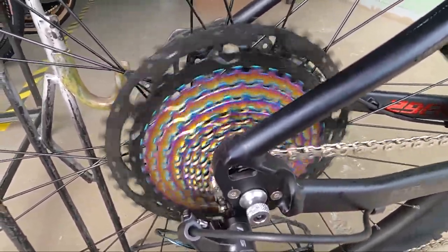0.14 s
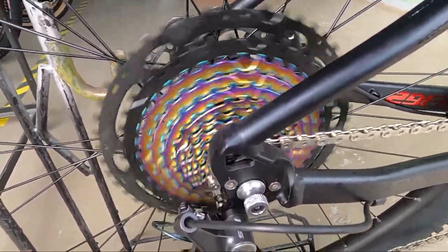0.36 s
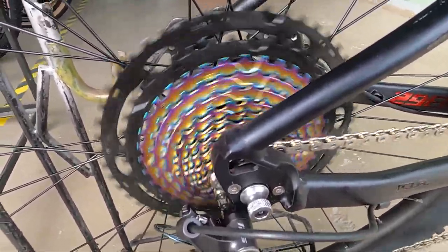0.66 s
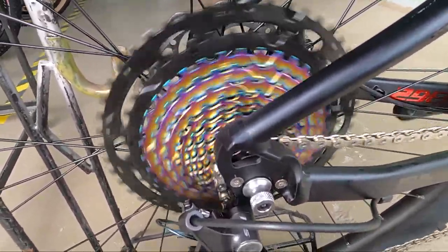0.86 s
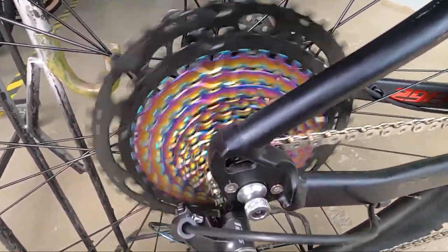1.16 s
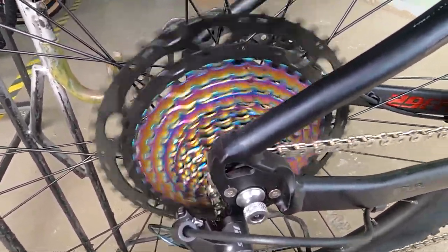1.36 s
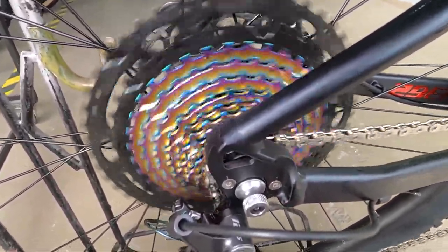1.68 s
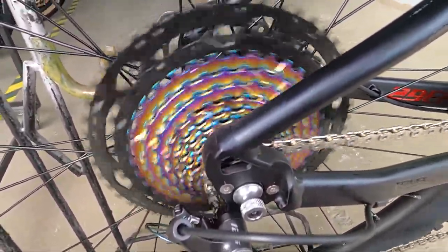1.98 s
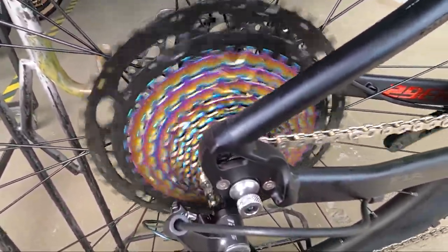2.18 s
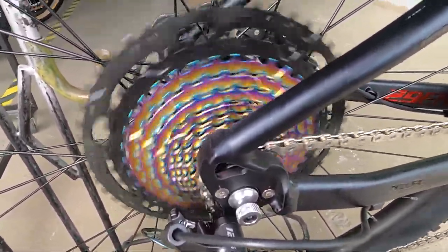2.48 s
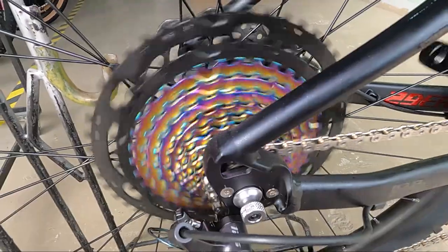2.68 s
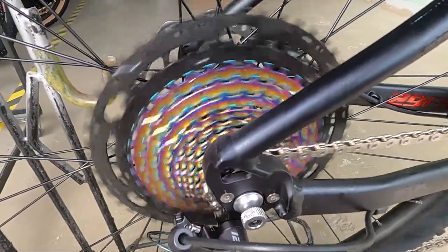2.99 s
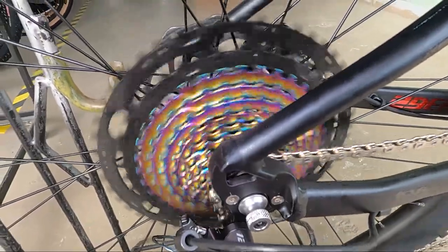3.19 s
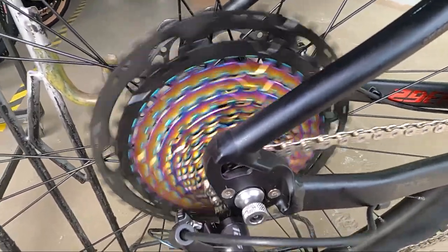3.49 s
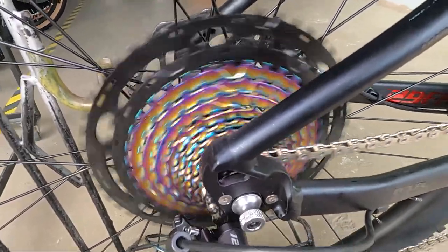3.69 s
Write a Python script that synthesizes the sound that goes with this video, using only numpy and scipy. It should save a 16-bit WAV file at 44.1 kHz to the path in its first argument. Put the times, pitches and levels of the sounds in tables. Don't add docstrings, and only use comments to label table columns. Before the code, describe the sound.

Rapid metallic ratchet buzz of a spinning bicycle rear hub, thin and hissy, gradually quickening.

```python
import sys
import numpy as np
from scipy import signal
from scipy.fft import rfft, irfft
from scipy.io import wavfile
from scipy.ndimage import uniform_filter1d, minimum_filter1d

SR = 44100
rng = np.random.default_rng(int(sys.argv[2]) if len(sys.argv) > 2 else 0)


def how_loud(loudness_db):
    steps = np.asarray(loudness_db, float) / 20
    return 10 ** steps


def put_to_file(sound):
    columns = np.atleast_2d(sound).T
    safe = np.clip(columns, -1, 1)
    whole_steps = np.round(safe * 32767)
    wavfile.write(sys.argv[1], SR, whole_steps.astype(np.int16))


N = 169785

# t/s, f/Hz (snaps of one pawl set)
RATCHET_SPEED = [(.17, 195), (.31, 177.1), (.45, 194.5), (.66, 179.1), (.96, 174), (1.07, 194.2),
                 (1.41, 196), (1.57, 174.9), (1.95, 181), (2.06, 192.2), (2.28, 186.8), (2.38, 205.3),
                 (2.57, 201.6), (2.88, 198.3), (2.97, 213.3), (3.38, 211), (3.52, 231.4), (3.68, 224.2)]
# f/Hz, width/Hz, level/dB
FRAME_MODES = [(1954.4, 56, -3), (2026, 77, -3.5), (2144, 63, -1.5), (2282, 30.5, 4), (2348, 35, 0.5),
               (2462, 70, -1.5), (2647, 105, -7), (2905, 370, -20.5)]
# t/s, level/dB
FRAME_GRIP = [(0.0, -34), (0.34, -32.5), (0.61, -39), (1.02, -33.5), (1.91, -40), (2.03, -44.5),
              (2.07, -39), (2.27, -42), (2.33, -32.5), (2.57, -40.5), (2.68, -30.5), (2.83, -41),
              (2.85, -30.5), (2.98, -39), (3.77, -43.5), (3.85, -55.5)]
# f/Hz, width/Hz, level/dB
HUB_MODES = [(6230, 174, -10.5), (7230, 47, -3.5), (7680, 130, -6), (8410, 150, -4.5), (8570, 108, -2),
             (9164, 220, -7), (9500, 390, -8.5), (10860, 160, -9), (11510, 214, -6.5), (12690, 320, -9.5),
             (14120, 340, -7), (16400, 120, 0.5)]
# f/Hz, density/dB per Hz
CRACK_COLOUR = [(3700, -18.5), (5900, -12), (6700, -8.5), (9000, -3.5), (10300, -7.5), (12100, -6.5),
                (13500, -12.5), (15700, -7)]
# upper edge f/Hz, gain/dB
SUPPRESSOR_BANDS = [
    (1500, -39),
    (1870, -47),
    (3020, 1),
    (3760, -62),
    (6080, -1),
    (12200, 4),
    (15750, 1.5),
    (22050, -57),
]
# from t/s, to t/s
LEAK_TIMES = [
    (0, .53),
    (.78, .92),
    (1.5, 1.55),
    (2.01, 2.04),
    (2.67, 2.7),
    (3.8, 3.85),
]
# lowest f/Hz, highest f/Hz, level/dB, threshold, threshold during leaks
FLICKER_STRIPS = [
    (3000, 3760, -68.5, 2.03, -0.12),
    (1506, 1870, -77, 0.15, 0.16),
    (906, 1500, -88, 1.7, 1.5),
]
# from t/s, to t/s, up to t/s also in the dull band
WIDE_TIMES = [(0, .27, .15), (.47, .54, .52), (.82, .96, .96), (1.12, 1.2, 1.18), (1.35, 1.71, 1.57),
              (1.96, 2.29, 2.1), (2.5, 2.54, 2.5), (2.61, 3.6, 2.71), (3.78, 3.85, 3.83)]
# f/Hz, level/dB
SIDE_COLOUR = [(60, -30), (180, -36), (550, -9), (1650, -27.5), (4970, -20), (15000, -22)]
# t/s, level/dB, f/Hz, length/s
SMALL_KNOCKS = [(0.177, -60, 154, 0.038), (.50, -72, 840, 0.027), (0.688, -70.5, 390, 0.058),
                (1.268, -74.5, 1102, 0.038), (1.517, -74, 257.7, 0.032), (1.762, -70.5, 697, .04),
                (2.068, -74, 1152, 0.044), (2.437, -81, 1238, .05), (3.457, -69, 249.2, 0.041),
                (3.724, -61, 840, 0.05), (3.731, -66, 447.2, 0.049), (3.809, -63, 547, 0.049),
                (3.783, -68, 1297, .07), (3.8, -72, 250, .05), (1.4, -71.5, 149, 0.34),
                (0.504, -77, 140, 0.37), (2.292, -59.5, 1680, 0.072), (3.3, -84, 644, 0.1)]
# f/Hz, density/dB per Hz
ROOM_COLOUR = [(15, -5), (28, -29), (44, -25.5), (120, -23), (157, -17.5), (195, -30), (480, -36.5),
               (1450, -39.5)]
# t/s, level/dB
CASE_THUMPS = [(.05, -64), (0.549, -54), (.76, -66), (1.25, -53), (1.4, -70), (1.78, -53), (2.06, -63),
               (2.3, -65), (2.47, -67), (2.8, -61), (3.18, -49)]

SECOND_SET_DB, SECOND_SET_LAG = -3, .47
JITTER_S, SNAP_SPREAD_DB = .000025, 2.13
SPEED_WOBBLE = .008
HUB_DB, HUB_WANDER_DB, HUB_RATTLE = -26.5, 1.5, 1.9
FRAME_RATTLE_DB, FRAME_WANDER_DB = -1.5, 2.2
GRIP_SHARE_TOP = 0.2
CRACK_DB, CRACK_DECAY_S, RATTLE_SHARE, CRACK_WANDER_DB = -26.5, 0.00091, 2.4, .6
MID_FADE_DB_PER_S, MID_TOP_HZ = -2.5, 5800
RATTLE_PER_S = 6000
WIDE_BRIGHT_DB, WIDE_DULL_DB = 2.5, 3
ROOM_DB, ROOM_PATCHY_DB = -69, 4
THUMP_S, THUMP_HZ = .024, 13
LIMIT = 0.38


def snaps():
    s, hz = np.transpose(RATCHET_SPEED)
    speed = uniform_filter1d(np.interp(np.arange(N) / SR, s, hz), size=1200)
    periods = np.cumsum(speed * (1 + SPEED_WOBBLE * drift(9.0))) / SR
    draws = rng.standard_normal((2000, 2))
    k = np.arange(len(draws))
    second = k % 2
    at = np.interp(k // 2 + second * SECOND_SET_LAG, periods, np.arange(N), right=2 * N)
    at = at + JITTER_S * SR * draws[:, 0]
    size = how_loud(second * SECOND_SET_DB + SNAP_SPREAD_DB * draws[:, 1])
    return np.clip(at, 0, N + 1), size


def hub(at, size):
    loose, out = rattle(), 0
    for hz, width, db in HUB_MODES:
        strikes = rms_one(train(at, size * rng.standard_normal(len(at))))
        push = strikes + HUB_RATTLE * np.roll(loose, int(hz))
        out = out + how_loud(db + HUB_WANDER_DB * drift(8.7)) * resonate(push, hz, width)
    return how_loud(HUB_DB) * rms_one(out)


def frame(at, size):
    s, db = np.transpose(FRAME_GRIP)
    grip = np.interp(np.arange(N) / SR, s, db)
    slope = np.polyval(np.polyfit(np.arange(N), grip, deg=1), np.arange(N))
    push = rms_one(train(at, size)) + how_loud(FRAME_RATTLE_DB) * rattle()
    rings = []
    for k, (hz, width, mode_db) in enumerate(FRAME_MODES):
        level = how_loud(mode_db + FRAME_WANDER_DB * drift(11.5))
        rings.append((-1) ** k * level * resonate(push, hz, width))
    loudness = np.sqrt(np.mean(sum(rings) ** 2))
    shares = np.linspace(1.15, GRIP_SHARE_TOP, len(FRAME_MODES))
    return sum(how_loud(slope + share * (grip - slope)) * r for share, r in zip(shares, rings)) / loudness


def crack(at, size):
    decay = np.exp(-1 / (CRACK_DECAY_S * SR))
    burst = rms_one(signal.lfilter([1], [1, -decay], train(at, size)))
    wander = how_loud(CRACK_WANDER_DB * (drift(5.6) + drift(25.0)))
    x = (burst + RATTLE_SHARE) * rng.standard_normal(N) * wander
    x = rms_one(shape(x, CRACK_COLOUR))
    dull = signal.sosfiltfilt(signal.butter(6, MID_TOP_HZ, fs=SR, output="sos"), x)
    fade = how_loud(MID_FADE_DB_PER_S * (np.arange(N) - N / 2) / SR)
    return how_loud(CRACK_DB) * (x - dull + dull * fade)


def rattle():
    return rms_one((rng.random(N) < RATTLE_PER_S / SR) * rng.standard_normal(N))


def suppress(x):
    edges, db = np.transpose(SUPPRESSOR_BANDS)
    hz = np.fft.rfftfreq(N, 1 / SR)
    steps = db[np.minimum(np.searchsorted(edges, hz), len(db) - 1)]
    out = irfft(rfft(x) * how_loud(uniform_filter1d(steps, size=160)), N)
    t = np.arange(N) / SR
    leaky = sum(1. * (t > a) * (t < b) for a, b in LEAK_TIMES)
    for low, high, strip_db, shut, ajar in FLICKER_STRIPS:
        cuts = np.linspace(low, high, 7)
        for a, b in zip(cuts, cuts[1:]):
            threshold = shut + (ajar - shut) * leaky
            opened = uniform_filter1d(1. * (drift(5.0) > threshold), size=1200)
            out += how_loud(strip_db) * opened * rms_one(between(x, a, b))
    return out


def channel_difference(mid):
    spectrum, t = rfft(mid), np.arange(N) / SR
    scatter = np.exp(.4j * np.cumsum(rng.standard_normal(len(spectrum))))
    far = irfft(spectrum * scatter, N)
    low = between(far, 0, MID_TOP_HZ)
    bright = uniform_filter1d(sum(1. * (t > a) * (t < b) for a, b, _ in WIDE_TIMES), size=600)
    dull = uniform_filter1d(sum(1. * (t > a) * (t < c) for a, _, c in WIDE_TIMES), size=600)
    side = how_loud(WIDE_BRIGHT_DB) * bright * (far - low)
    side = side + how_loud(WIDE_DULL_DB) * dull * between(low, 1800, MID_TOP_HZ)
    return shape(side, SIDE_COLOUR)


def knocks():
    t, white, out = np.arange(N) / SR, rng.standard_normal(N), np.zeros(N)
    for s, db, hz, length in SMALL_KNOCKS:
        width = .12 * hz + 25
        band = rms_one(resonate(resonate(white, hz, width), hz, width))
        out += how_loud(db) * band * np.exp(-((t - s - length / 2) / (length / 2)) ** 4)
    return out


def room():
    noise = rms_one(shape(rng.standard_normal(N), ROOM_COLOUR + [(1600, -71)]))
    edges = np.geomspace(5, 1800, 12)
    return sum(between(noise, a, b) * how_loud(ROOM_DB + ROOM_PATCHY_DB * drift(2.8))
               for a, b in zip(edges, edges[1:]))


def thumps():
    t = np.arange(N) / SR
    return sum(how_loud(db) * np.cos(2 * np.pi * THUMP_HZ * (t - s)) * np.exp(-((t - s) / THUMP_S) ** 2)
               for s, db in CASE_THUMPS)


def train(at, size):
    i = at.astype(int)
    early = np.bincount(i, size * (1 - at + i), N + 4)
    late = np.bincount(i + 1, size * (at - i), N + 4)
    return (early + late)[:N]


def resonate(x, hz, width):
    r = np.exp(-np.pi * width / SR)
    poles = [1, -2 * r * np.cos(2 * np.pi * hz / SR), r * r]
    return signal.lfilter([(1 - r * r) / 2, 0, (r * r - 1) / 2], poles, x + 1e-18)


def drift(rate):
    r = np.exp(-80 * np.pi * rate / SR)
    slow = signal.lfilter([1], [1, -2 * r, r * r], rng.standard_normal(N // 40 + 2002))[2000:]
    return np.interp(np.arange(N) / 40, np.arange(len(slow)), rms_one(slow))


def shape(x, points):
    hz = np.maximum(np.fft.rfftfreq(N, 1 / SR), 5)
    p = np.array(points)
    return irfft(rfft(x) * how_loud(np.interp(np.log(hz), np.log(p[:, 0]), p[:, 1])), N)


def between(x, low_hz, high_hz):
    hz = np.fft.rfftfreq(N, 1 / SR)
    return irfft(rfft(x) * (hz > low_hz) * (hz <= high_hz), N)


def rms_one(x):
    return x / np.sqrt(np.mean(x ** 2) + 1e-20)


def scene():
    at, size = snaps()
    wheel = hub(at, size) + frame(at, size) + crack(at, size)
    mid = suppress(wheel) + knocks() + room() + thumps()
    side = channel_difference(mid)
    return np.array([mid + side, mid - side])


def roll_off(x):
    return signal.sosfilt(signal.butter(12, 16840, fs=SR, output="sos"), x)


def record(dry):
    mid = dry.mean(axis=0)
    gain = np.minimum(1, LIMIT / (np.abs(mid) + 1e-9))
    gain = uniform_filter1d(minimum_filter1d(gain, size=441), size=441)
    return roll_off(dry * gain)


dry = scene()
out = record(dry)
put_to_file(out)
```